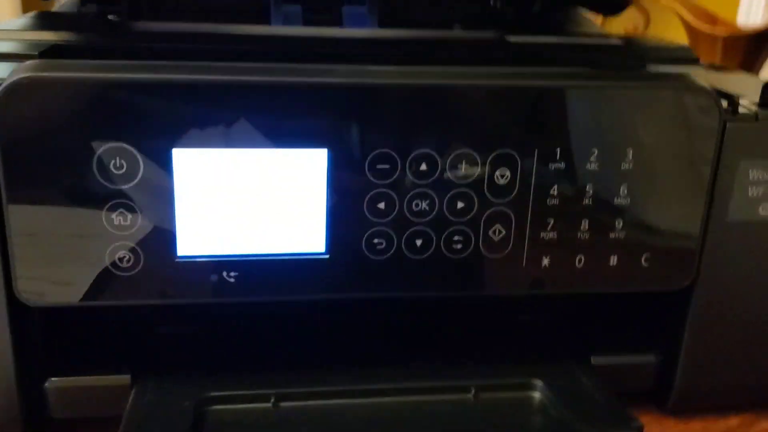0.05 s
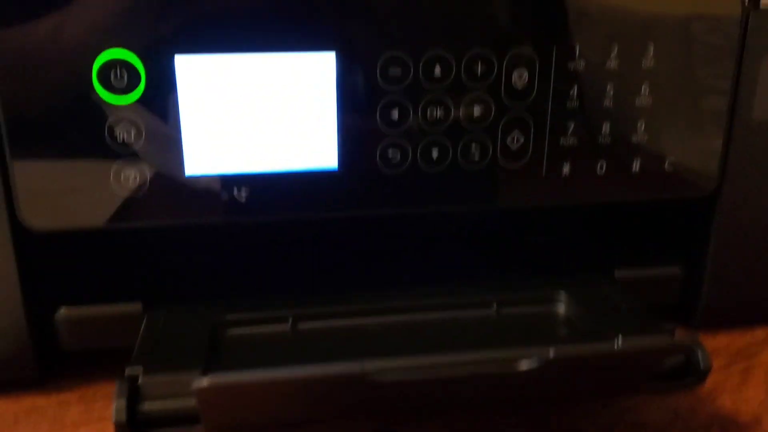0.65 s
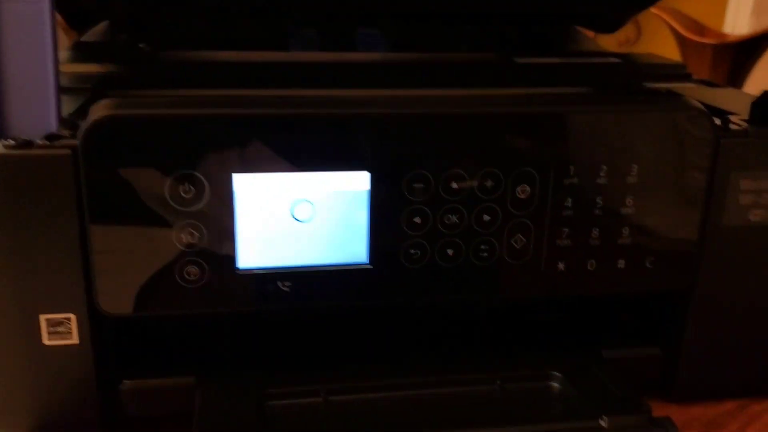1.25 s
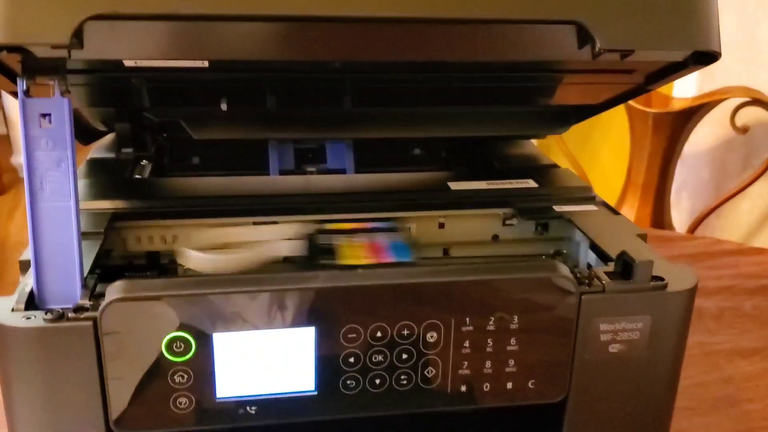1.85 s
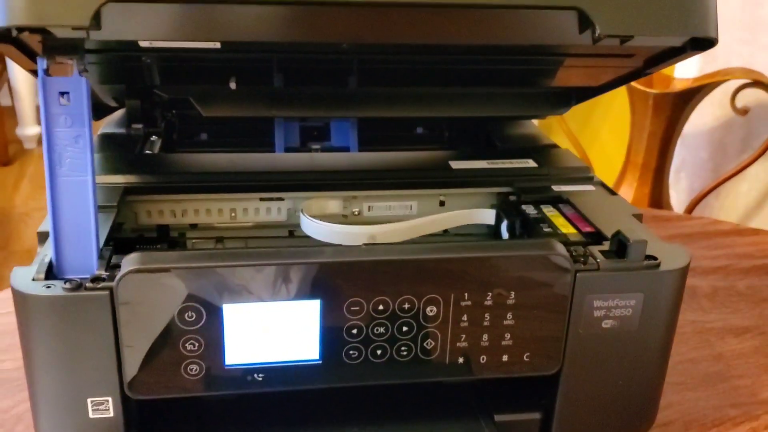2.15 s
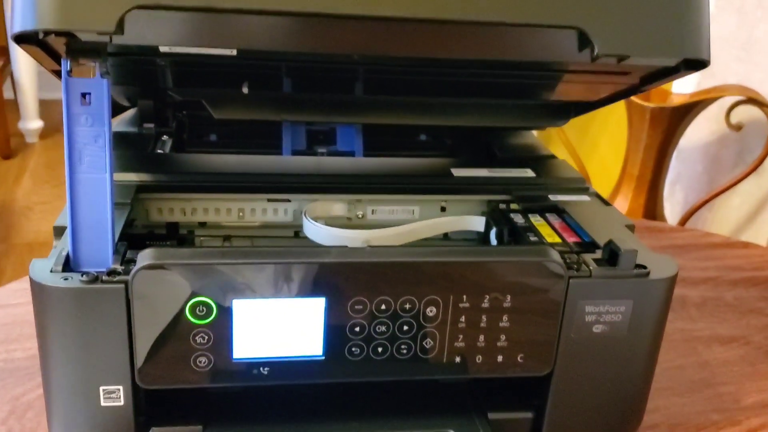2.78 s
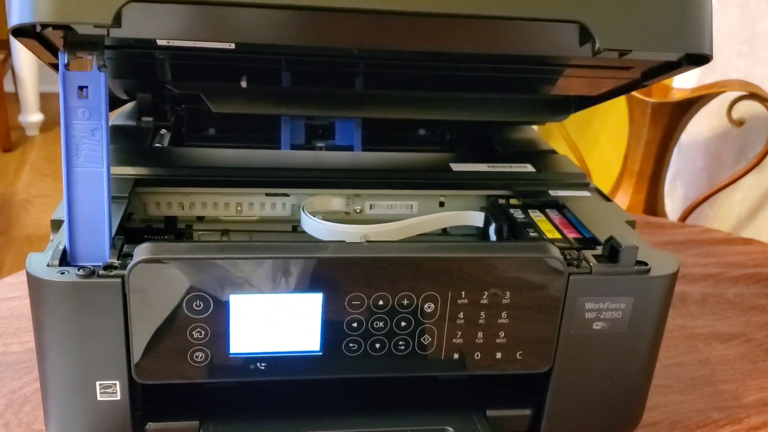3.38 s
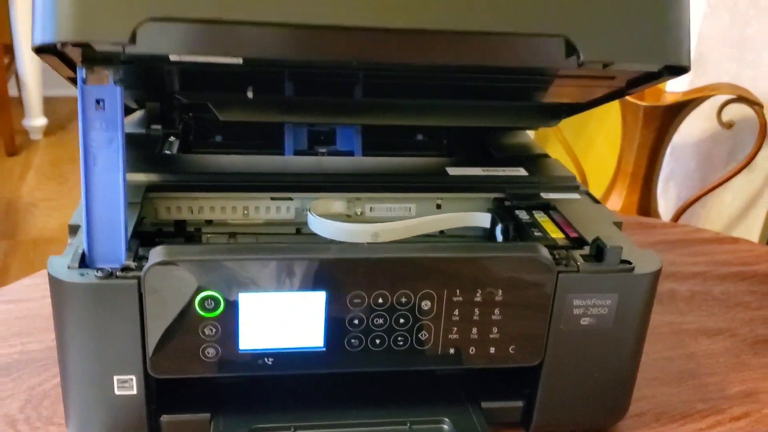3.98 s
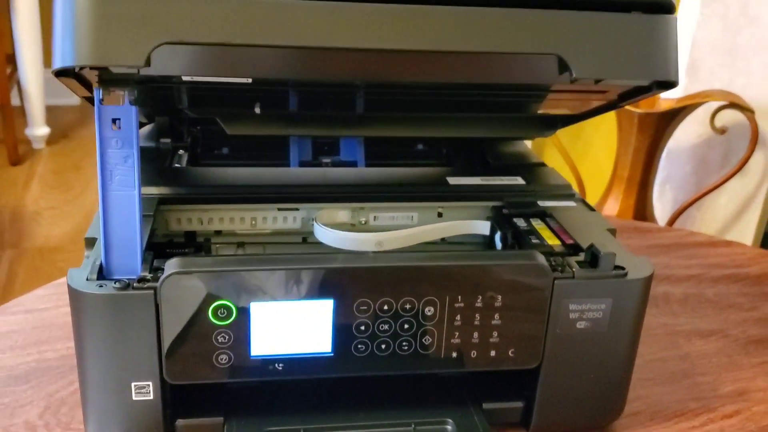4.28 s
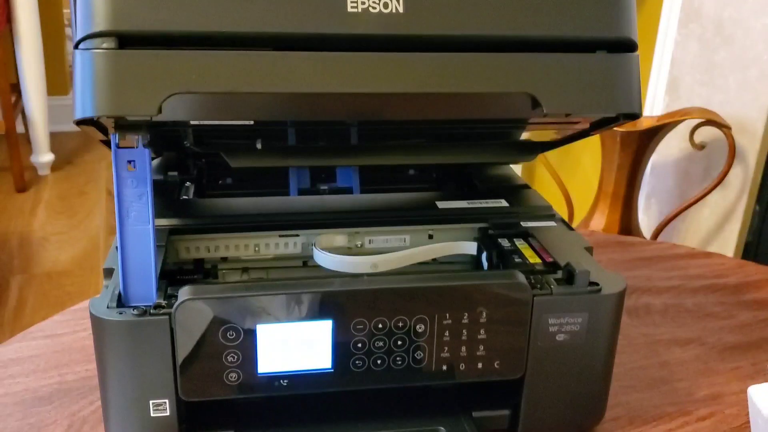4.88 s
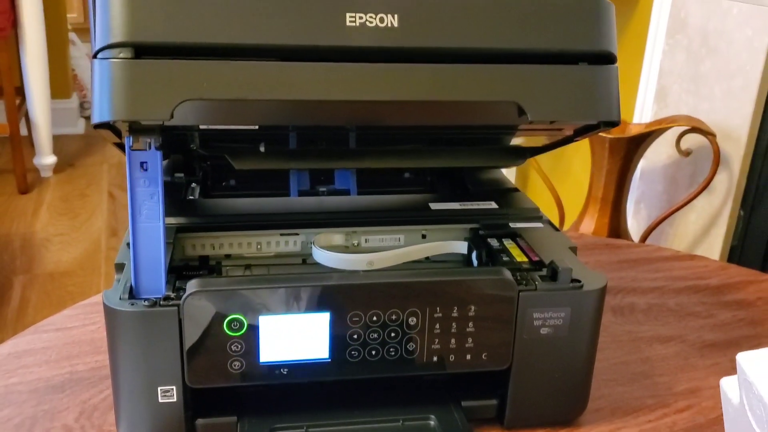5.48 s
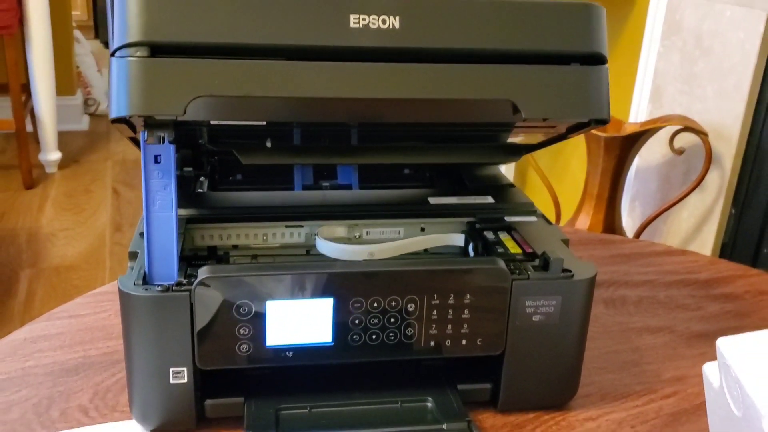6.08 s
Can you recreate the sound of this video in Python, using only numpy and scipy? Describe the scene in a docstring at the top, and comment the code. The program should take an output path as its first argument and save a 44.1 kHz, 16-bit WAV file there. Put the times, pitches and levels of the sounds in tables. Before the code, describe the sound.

Irregular knocks and short carriage strokes from an open printer give way to sharp clacks and a steady, rattling motor whir.

```python
"""On a wooden table, an inkjet printer starts up while its scanner lid is lifted and propped open.
The print carriage slides in short strokes, its belt whining, and knocks against its stops. Then a latch
clacks in and the feed motor turns its plastic gears twice: briefly, then steadily with a rattle, hum and
whine. Handling adds soft thumps, and fingers brush and tap the microphone on the right.
Underneath are a quiet whir and the rumble of the room."""
import sys
import numpy as np
from scipy import signal
from scipy.fft import rfft, irfft, next_fast_len
from scipy.io import wavfile

SR = 44100
rng = np.random.default_rng(int(sys.argv[2]) if len(sys.argv) > 2 else 0)


def transcribe(u):
    """Save the signal u as a 16-bit wav file named by the first command-line argument.

    u: samples, shape (n,) or (channels, n), limited to [-1, 1]; the rate is SR.
    q: integer samples, one column per channel.
    """
    v = np.clip(np.atleast_2d(u).T, -1, 1)
    q = np.round(v * 32767).astype(np.int16)
    wavfile.write(sys.argv[1], SR, q)


N = 274743
TIME = np.arange(N) / SR

# The carriage touches a stop, then slams home and jolts the table. Positive tilt sounds brighter.
# slam_s, slam_db, touch_db, touch_ahead_s, touch_length_s, tilt_db_per_octave, ring_db, jolt_db
STOPS = [(0.38, -18, -31, .021, .033, 1.35, -2, -12), (1.329, -31, -24.5, 0.026, 0.01, -0.24, 3.5, -25),
         (1.515, -20, -35.5, .029, .024, .1, -1.5, -18.5),
         (2.12, -32.5, -30.5, 0.029, 0.025, -0.3, -6, -24.5),
         (2.514, -21, -40.5, .025, .024, -0.55, -4.5, -19),
         (3.496, -29, -37.5, 0.024, 0.025, 0.2, -11, -31)]
# The tone of rubbing: pitch_hz, relative_db
RUB_COLOUR = [(100, -6.5), (400, -3), (900, -3.5), (1600, -1), (3500, 3.5), (7000, -4), (8500, -6),
              (12000, -3), (16000, -8)]


def long_gear_run(start_s=4.176, mesh_hz=947.6, teeth=22, slaps_per_s=40):
    """The feed motor turns steadily: the gear teeth rattle and whine, and the case hums."""
    # How the load on the gears changes their sound: time_s, whine_relative_db, hum_relative_db
    gear_load = [(4.24, -34.5, -30.5), (4.9, -33.5, -31.5), (5.16, -32, -27.5), (5.4, -34, -29.5),
                 (6.22, -35.5, -27.5)]
    # Tones of the meeting teeth: multiple_of_mesh_hz, relative_db, left_over_right_db
    gear_tones = [(.9425, 0, 1), (1.0, -2.5, 7), (1.9425, -15, 2), (3.0, -12, 2), (1.058, -9, 5),
                  (1.118, -14, 1), (.8665, -14, 2), (.7465, -15, -3)]
    # The tone of the rattle and of the hum: pitch_hz, relative_db
    rattle_colour = [(60, -15.5), (110, 1), (180, -9.5), (300, -0.5), (600, -1.5), (900, 2.5), (1500, -2.5),
                     (2000, -5.5), (3300, -4.5), (4500, -12), (7200, -19), (8100, -29), (10000, -30),
                     (16000, -29)]
    hum_colour = [(150, -36), (210, -31), (250, -2), (400, -0.5), (550, 2), (700, -8.5), (1000, -36)]
    # Where the case rings under each: pitch_hz, width_hz, boost_db
    rattle_modes = [(818, 37, 6), (975, 100, 2), (1357, 116, 7), (2444, 56, 6), (2848, 75, 5),
                    (3270, 97, -3), (5520, 140, 2.5), (5880, 200, 3.5), (7200, 360, 7), (8950, 200, -1)]
    hum_modes = [(257.3, 20, 10.6), (369.5, 20.4, 10.3), (493.5, 31, 7.3)]
    on = running(start_s, np.inf, ramp_s=.018)
    age_s = np.maximum(TIME - start_s, 0)
    rattle_db = -27 + 8 * np.exp(-age_s / .06) + .8 * age_s  # surges, settles, then creeps up
    whine_db, hum_db = curves(gear_load)
    mesh_phase = 2 * np.pi * np.cumsum(mesh_hz * (1 + .0012 * drift(1.5))) / SR
    throb = 1 + .22 * np.sin(mesh_phase / teeth)  # once for each turn of the small gear
    # Now and then a tooth slaps across the gap to its neighbour.
    slaps = (rng.random(N) < slaps_per_s / SR) * rng.standard_normal((2, N)) * from_db(14.5)
    force = (grains(spread_db=.5) + slaps) * throb * on * from_db(rattle_db)
    rattle = radiate(force, rattle_colour, rattle_modes)
    hum = radiate(rng.standard_normal((2, N)) * on * from_db(hum_db - .5), hum_colour, hum_modes)
    whine = np.zeros((2, N))
    for multiple, db, pan_db in gear_tones:
        # Loose teeth make each tone waver; it reaches the two sides out of step.
        phase = multiple * mesh_phase + .68 * drift(9.4) + np.array([[.6], [-.6]])
        whine += pan(from_db(db + 1.5 * drift(18)) * np.sin(phase), pan_db)
    return pan(rattle, 1.8) + hum + whine * on * from_db(whine_db + 6)


def short_gear_run(start_s=2.965, stop_s=3.472, turn_hz=43, level_db=-27):
    """The gears rattle under load for half a second, throbbing with each turn of the shaft."""
    # The tone of the rattle: pitch_hz, relative_db
    colour = [(35, -47), (60, -9.5), (164, -11.5), (202, -11), (323, -6), (515, -9), (621, -2.5), (682, -5),
              (1090, -9), (1220, -5.5), (1700, -11), (5850, -24.5), (8310, -35.5), (16000, -42.5)]
    # Where the case rings: pitch_hz, width_hz, boost_db
    modes = [(342, 78, 4.5), (617, 34, 7.8), (673, 30, 3.5), (810, 66, 4.8), (1207, 14, 5.6),
             (2440, 60, 3.4), (6940, 150, 4)]
    throb = 1 + .12 * np.sin(2 * np.pi * turn_hz * TIME)
    force = grains(spread_db=1.5) * throb * from_db(level_db) * running(start_s, stop_s, ramp_s=.01)
    return pan(radiate(force, colour, modes), 2.4)


def carriage(belt_hz=1036, whine_db=-5.5):
    """The carriage hisses along its rail and its belt whines: louder and higher as it speeds up."""
    # Strokes along the rail: start_s, stop_s, full_speed_db
    strokes = [(0.642, .813, -35.5), (0.784, .952, -36.5), (0.922, 1.084, -35), (1.143, 1.307, -38),
               (1.782, 1.949, -39), (1.922, 2.096, -39.5)]
    # The tone of the hiss: pitch_hz, relative_db
    rail_colour = [(60, -7), (150, 0), (280, 3), (500, -5.5), (1000, -9), (2000, -13), (4500, -12.5),
                   (7000, -17), (8200, -22), (11000, -21), (16000, -17.5)]
    # Where the rail and case ring: pitch_hz, width_hz, boost_db
    rail_modes = [(230, 80, 3), (1350, 150, 4), (3220, 200, 7), (3950, 250, 5), (4480, 140, 8),
                  (5550, 300, 6), (7050, 300, 4), (11400, 400, 4)]
    slide, whine = np.zeros(N), np.zeros(N)
    for start_s, stop_s, db in strokes:
        speed = np.sin(np.pi / 2 * running(start_s, stop_s, ramp_s=.065))
        level = from_db(db) * speed ** 1.58
        pitch_hz = belt_hz * speed ** .7 * (1 + .025 * drift(120))
        slide += level
        whine += level * np.sin(2 * np.pi * np.cumsum(pitch_hz) / SR)
    hiss = radiate(grains(spread_db=2.5) * slide, rail_colour, rail_modes)
    roughness = 1 + .5 * drift(80)
    return pan(hiss + from_db(whine_db) * whine * roughness, 2.5)


def frame_knocks(slam_length_s=.01095, stop_pan_db=2.2, tick_ring_db=-14):
    """The carriage hits each stop twice, a touch and a slam, and small parts tick on the frame."""
    # Ticks of small parts: time_s, level_db, contact_s, tilt_db_per_octave
    ticks = [(0.7306, -25, .0005, 1.5), (.941, -38.5, 0.0025, 5.5), (1.358, -39, .0019, 8),
             (2.615, -46, .005, -3.5), (3.444, -30, 0.009, -.5), (3.73, -42, 0.027, -7.5)]
    # The tone of a knock: pitch_hz, relative_db
    colour = [(50, -27), (150, 3), (350, -3.5), (800, -3), (1400, -6), (2500, -10.5), (4500, -18.5),
              (7000, -23.5), (9000, -34), (16000, -37.5)]
    # Where the knocked case rings: pitch_hz, width_hz, boost_db
    modes = [(327, 93, 8.5), (770, 125, 9.1), (960, 64, 5.2), (1358, 37, 8.1), (1800, 31, 1.7),
             (3440, 200, 3.8)]
    hits = []
    for slam_s, slam_db, touch_db, ahead_s, touch_length_s, tilt, ring_db, _ in STOPS:
        hits.append((slam_s - ahead_s, touch_db, touch_length_s, tilt, stop_pan_db, ring_db))
        hits.append((slam_s, slam_db, slam_length_s, tilt, stop_pan_db, ring_db))
    hits += [(*tick, 0, tick_ring_db) for tick in ticks]  # in the middle
    return blows(hits, colour, modes, swell_db=-9.5, swell_s=.0095, fade_s=.032,
                 echo_db=-6, echo_s=.2, grain_db=1.5)


def latch_clacks(tilt=1, pan_db=1.5, ring_db=-9):
    """The latch and the gear teeth snap into place with short, bright clacks."""
    # Snaps: time_s, level_db, contact_s
    clacks = [(2.9829, -16.5, 0.0035), (4.187, -12, 0.01), (4.211, -25, .0075), (4.703, -33.5, .003),
              (5.468, -30, .0036)]
    # The tone of a clack: pitch_hz, relative_db
    colour = [(100, -15), (300, -9), (1000, -1.5), (3000, -3), (6500, -3), (8000, -9.5), (11000, -12.5),
              (16000, -16)]
    # Where the case rings after a clack: pitch_hz, width_hz, boost_db
    modes = [(900, 120, 5), (3000, 740, 9.1), (4550, 190, 3.2), (5270, 230, 1.8), (6230, 1000, 6),
             (8950, 400, 9.2)]
    hits = [(*clack, tilt, pan_db, ring_db) for clack in clacks]
    return blows(hits, colour, modes, swell_db=-9, swell_s=.0032, fade_s=.015,
                 echo_db=-10.5, echo_s=.25, grain_db=1)


def blows(hits, colour, modes, swell_db, swell_s, fade_s, echo_db, echo_s, grain_db):
    """A brief soft swell of noise leads into each hit; parts chatter, the frame rings, the room echoes."""
    # Notes of the struck frame: pitch_hz, relative_db, fade_s (time to fall by 60 dB)
    frame_notes = [(335, -7.5, 0.045), (761, -1.5, 0.066), (900, -4.5, 0.061), (1290, -1.5, 0.052),
                   (1830, -13, 0.018)]
    out = np.zeros((2, N))
    t = TIME[:SR // 3] - .03  # the parts meet at t = 0
    for time_s, db, contact_s, tilt, pan_db, ring_db in hits:
        swell = from_db(swell_db) * np.exp(np.minimum(t, 0) / swell_s)
        shape = np.where(t < 0, swell, from_db(-60 * np.maximum(t - contact_s, 0) / fade_s))
        force = grains(grain_db, size=len(t)) * shape
        force *= np.sqrt(np.sum(shape ** 2) / np.sum(force ** 2, axis=1, keepdims=True))
        echo = rng.standard_normal(force.shape) * from_db(echo_db - 60 * t / echo_s) * (t > contact_s)
        echo *= np.sqrt(contact_s / fade_s)  # a brief tap sends little energy into the room
        chatter = radiate(force + echo, colour, modes, tilt)
        side_lead_s = rng.uniform(0, .0003, (2, 1))  # one side hears the ring slightly sooner
        frame = from_db(ring_db) * ring(frame_notes, t - contact_s / 4 + side_lead_s)
        add(out, from_db(db) * pan(chatter + frame, pan_db), time_s + t[0])
    return out


def table_thumps(faint_count=8, faint_until_s=2.6, bump_cycles=.89):
    """Slams and soft bumps sway the table for a cycle or two and set it shuddering."""
    # Bumps of lid, table and hand: middle_s, level_db, pitch_hz, cycles (of swell and of fade)
    bumps = [(.033, -24, 126, 0.52), (.143, -25, 90, .4), (.409, -25, 62, 1), (.591, -27.5, 95, .65),
             (.668, -23, 85, .75), (1.809, -29, 98, 0.9), (2.08, -26, 70, .7), (2.712, -29.5, 78, 1.5),
             (2.866, -25, 65, .5), (3.708, -32.5, 82, 1), (3.92, -32.5, 50.5, 1), (4.279, -16.5, 62, 0.39),
             (4.475, -26.5, 55, 1.3), (5.206, -19.5, 81.5, .7), (5.399, -29, 49, 1.6)]
    # The harder the carriage slams, the deeper the jolt.
    jolts = [(slam_s, jolt_db, 71 * 2 ** ((-18 - slam_db) / 18), bump_cycles)
             for slam_s, slam_db, *_, jolt_db in STOPS]
    faint = []  # chance bumps of the hand on the lid
    for k, (when, size, pitch) in enumerate(rng.random((faint_count, 3))):
        middle_s = faint_until_s * (k + when) / faint_count
        faint.append((middle_s, -37.5 + 8 * (size - .5), 85 * 2 ** (pitch - .5), bump_cycles))
    out = np.zeros((2, N))
    for middle_s, db, hz, cycles in jolts + bumps + faint:
        t = TIME[:SR // 5] - min(middle_s, .1)
        side_phase = .34 * rng.choice([-1, 1]) * np.array([[1], [-1]])
        sway = -np.sin(2 * np.pi * hz * t + side_phase)
        low_pass = signal.butter(2, 1.7 * hz, fs=SR, output="sos")
        shudder = .29 * unit_power(signal.sosfilt(low_pass, rng.standard_normal((2, len(t)))))
        swell = from_db(db) / np.cosh(1.72 * t * hz / cycles)
        add(out, (sway + shudder) * swell, middle_s + t[0])
    return out


def finger_rubs():
    """Fingers brush the microphone on the right, in short gritty swells."""
    # Brushes: middle_s, level_db, half_length_s, tilt_db_per_octave
    rubs = [(0.104, -45, 0.027, -3.5), (0.125, -34.5, .002, 2), (.134, -33.5, .0053, 5),
            (.175, -29.5, .011, .3), (0.454, -35, 0.03, -4), (.475, -29.5, .005, -2),
            (.563, -38, 0.014, -1.5)]
    out = np.zeros((2, N))
    for middle_s, db, half_s, tilt in rubs:
        t = TIME[:SR // 3] - min(middle_s, .16)
        force = grains(spread_db=3, size=len(t)) / np.cosh(1.32 * t / half_s)
        pan_db = -27.5 - 4 * tilt  # nearer rubs are brighter and more one-sided
        add(out, from_db(db) * pan(radiate(force, RUB_COLOUR, tilt=tilt), pan_db), middle_s + t[0])
    return out


def finger_tap(time_s=.4286, gain_db=1.5, pan_db=-28):
    """A fingertip taps the microphone: one sharp click on the right."""
    # Notes of the click: pitch_hz, relative_db, fade_s (time to fall by 60 dB)
    tap_notes = [(275, -7, 0.014), (1170, 2.5, 0.0045), (1650, -3, 0.0044), (4660, -12.5, 0.0062),
                 (11600, -16, 0.0039)]
    out = np.zeros((2, N))
    add(out, pan(from_db(gain_db) * ring(tap_notes, TIME[:SR // 20]), pan_db), time_s)
    return out


def lid_slide():
    """Plastic drags dully on plastic as the lid is lifted and propped."""
    # Loudness of the drag: time_s, level_db
    drag = [(0, -51.5), (.2, -50), (.255, -59.5), (.33, -45), (.56, -43), (.85, -49), (1.66, -68),
            (1.765, -53.5), (1.95, -85)]
    db, = curves(drag)
    return pan(radiate(grains(spread_db=3.5) * from_db(db), RUB_COLOUR, tilt=-4), -2)


def idle_whir():
    """The printer whirs softly over the low rumble of the room."""
    # Loudness of whir and room together: time_s, level_db
    loudness = [(0, -44.5), (.9, -40), (1.45, -44), (2.1, -46), (2.42, -50.5), (2.6, -42.5), (2.9, -49.5),
                (3.55, -44), (3.95, -50)]
    # Their tone: pitch_hz, relative_db
    colour = [(25, -8), (60, -2), (150, -4.5), (280, -5), (450, -13.5), (700, -21), (1200, -24.5),
              (2100, -31), (2900, -37.5), (4400, -47.5), (6800, -45), (8000, -56), (11000, -53.5),
              (16000, -54)]
    # Where the whir rings: pitch_hz, width_hz, boost_db
    modes = [(3500, 400, 8), (6500, 600, 2)]
    db, = curves(loudness)
    return from_db(db) * radiate(rng.standard_normal((2, N)), colour, modes)


def radiate(force, colour, modes=(), tilt=0):
    """A body colours two rows of force and sends them left and right; tilt is in dB per octave."""
    # How alike the two sides sound: pitch_hz, likeness (0 unrelated, 1 the same)
    likeness = [(40, 0.62), (120, 0.94), (280, 0.98), (560, 0.88), (950, 0.49), (2000, 0), (8000, 0.053),
                (16000, 0)]
    length = force.shape[1]
    size = 2 * next_fast_len(length // 2 + 2048)
    hz = np.maximum(np.arange(size // 2 + 1) * SR / size, 1)
    db = at_hz(colour, hz) + tilt * np.log2(np.maximum(hz, 150))
    for pitch_hz, width_hz, boost_db in modes:
        db = db + boost_db / (1 + (2 * (hz - pitch_hz) / width_hz) ** 2)
    # A minimum-phase filter: the body rings only after it is struck.
    cepstrum = irfft(np.log(unit_power(from_db(db))))
    cepstrum[1:size // 2] *= 2
    cepstrum[size // 2 + 1:] = 0
    mid, side = rfft(force, size) * np.exp(rfft(cepstrum))
    alike = at_hz(likeness, hz)
    side *= np.sqrt((1 - alike) / (1 + alike))
    return irfft(np.array([mid + side, mid - side]))[:, :length]


def grains(spread_db, size=N):
    """Many tiny contacts of uneven strength, in two unrelated rows."""
    strength = from_db(spread_db * np.clip(rng.standard_normal(size // 16 + 1), -2.5, 2.5))
    return unit_power(rng.standard_normal((2, size)) * np.repeat(strength, 16)[:size])


def ring(notes, t):
    """Pure tones that start at t = 0 and die away."""
    t = np.maximum(t, 0)
    return sum(from_db(db - 60 * t / fade_s) * np.sin(2 * np.pi * hz * t) for hz, db, fade_s in notes)


def drift(rate_hz, steps_per_s=400):
    """A smooth random wobble, about 1 in size."""
    steps = rng.standard_normal(int(N / SR * steps_per_s) + steps_per_s)
    memory = np.exp(-2 * np.pi * rate_hz / steps_per_s)
    smooth = signal.lfilter([1], [1, -2 * memory, memory * memory], steps)[steps_per_s - 1:]
    return np.interp(TIME * steps_per_s, np.arange(len(smooth)), unit_power(smooth))


def running(start_s, stop_s, ramp_s):
    """1 while a motor turns, with a ramp at each end."""
    return np.clip((TIME - start_s) / ramp_s, 0, 1) * np.clip((stop_s - TIME) / ramp_s, 0, 1)


def curves(rows):
    """Join timed points with straight lines, one curve for each column of values."""
    times, *columns = np.transpose(rows)
    return [np.interp(TIME, times, column) for column in columns]


def at_hz(points, hz):
    """Read between points along a pitch scale."""
    pitches, values = np.transpose(points)
    return np.interp(np.log(hz), np.log(pitches), values)


def from_db(db):
    """Decibels to gain."""
    return 10 ** (np.asarray(db) / 20)


def unit_power(x):
    """Scale to an average power of 1."""
    return x / np.sqrt(np.mean(x ** 2) + 1e-20)


def pan(x, db):
    """Lean to the left by db (right if negative), keeping the power."""
    return x * unit_power(from_db([[db / 2], [-db / 2]]))


def add(out, sound, time_s):
    """Mix a sound in at the given time."""
    start = max(round(time_s * SR), 0)
    out[:, start:start + sound.shape[1]] += sound[:, :N - start]


def scene():
    """The open printer from an arm's length away."""
    machine = frame_knocks() + latch_clacks() + carriage() + short_gear_run() + long_gear_run()
    return machine + table_thumps() + finger_rubs() + finger_tap() + lid_slide() + idle_whir()


def record(dry):
    """The loudest peaks are flattened, and the treble above 16050 Hz is cut."""
    low_pass = signal.ellip(12, .1, 70, 16050, fs=SR, output="sos")
    return signal.sosfilt(low_pass, np.clip(dry, -.86, .86))


dry = scene()
out = record(dry)
transcribe(out)
```